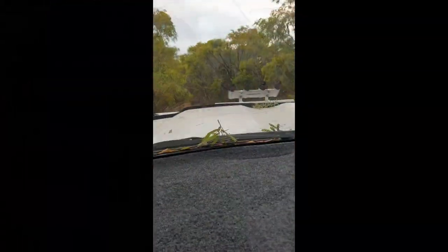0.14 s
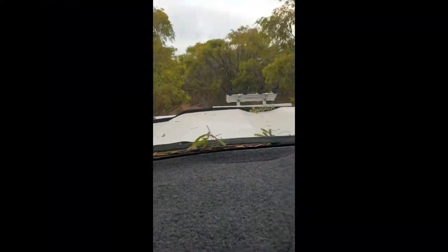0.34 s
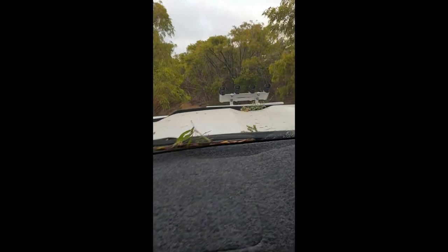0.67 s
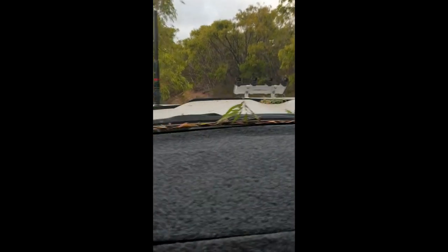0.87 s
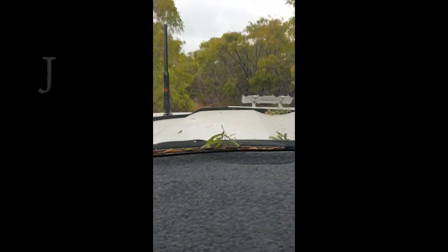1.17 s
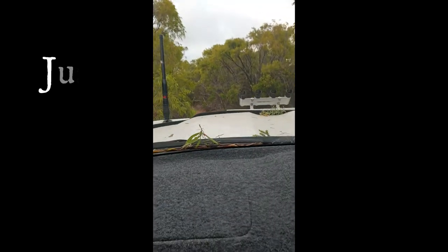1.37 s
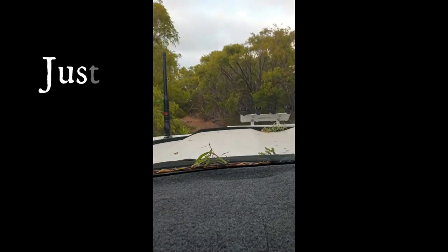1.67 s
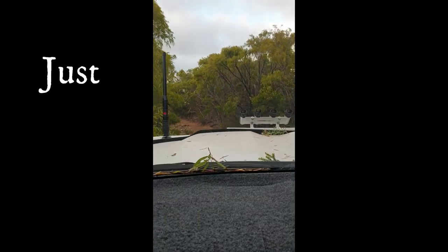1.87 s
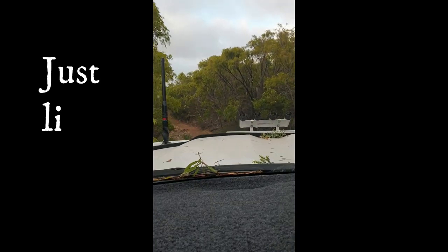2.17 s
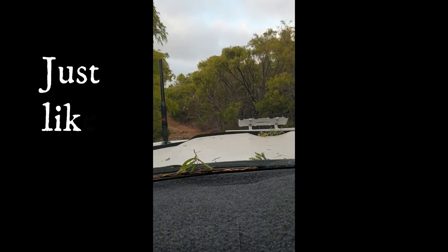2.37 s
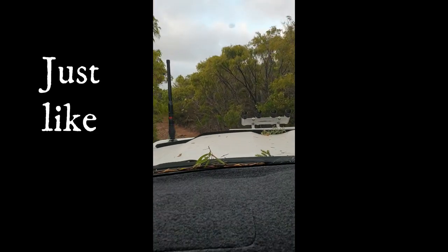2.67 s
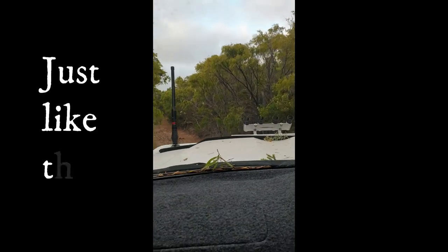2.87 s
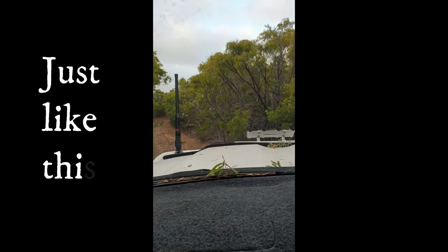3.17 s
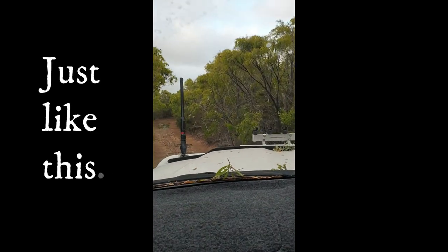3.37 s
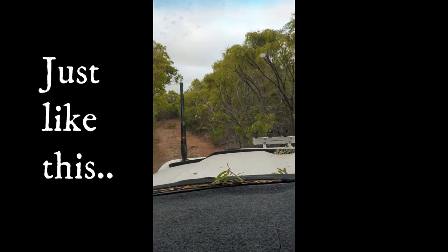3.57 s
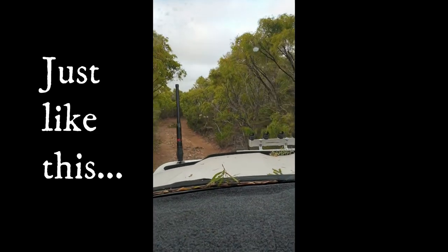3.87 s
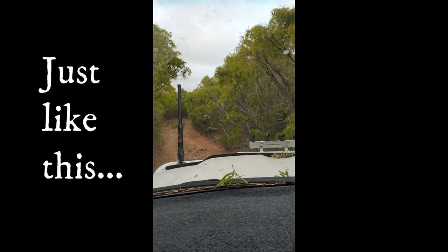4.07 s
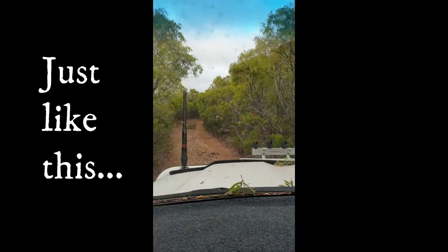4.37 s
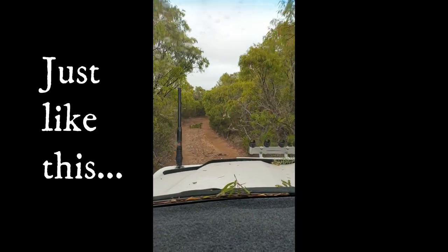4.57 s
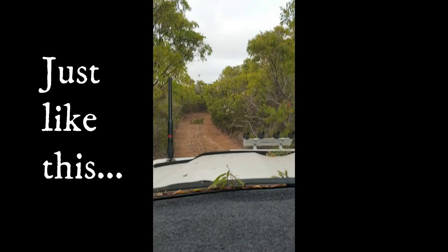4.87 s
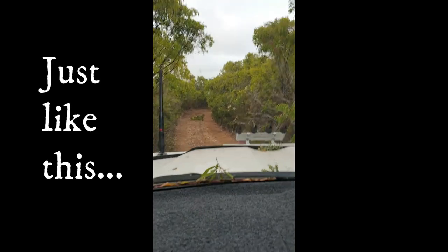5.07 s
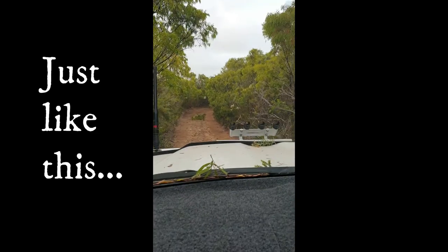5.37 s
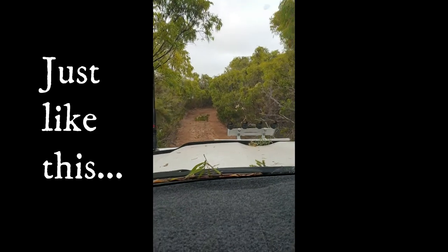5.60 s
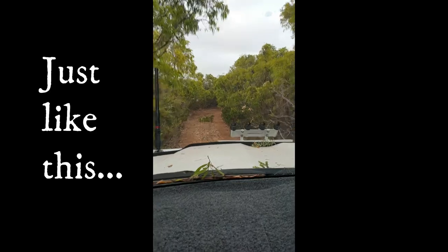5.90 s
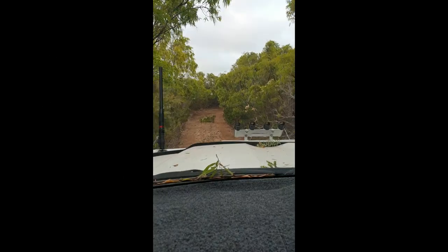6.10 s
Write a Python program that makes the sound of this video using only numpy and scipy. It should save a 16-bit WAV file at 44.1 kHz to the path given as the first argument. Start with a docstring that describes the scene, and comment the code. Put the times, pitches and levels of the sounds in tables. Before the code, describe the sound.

A vehicle cabin rumbles and clatters over ruts while leaves brush the paint and twigs crack, ending in high squeaks and rasping branch scrapes on the right.

```python
"""Overgrown dirt track from inside a four-wheel drive

The engine booms as pulses at its firing rate, revs twice and settles; the body adds short low notes.
Tyres roll as low noise, rough ground drums the body, and the load clatters in grains and knocks.
Leaves brush the paint as dense puffs of noise; twigs whip it with short coloured bursts.
At the end a branch drags along the right side, with stick-slip tones and jerky buzzing rasps."""
import sys
import numpy as np
from scipy import signal
from scipy.fft import rfft, irfft, next_fast_len
from scipy.io import wavfile

SR = 44100
rng = np.random.default_rng(int(sys.argv[2]) if len(sys.argv) > 2 else 0)


def put_to_file(sound):
    """Save the sound as 16-bit audio at rate SR, in the file named by the first command-line argument."""
    columns = np.atleast_2d(sound).T  # one column per channel
    safe = np.clip(columns, -1, 1)
    whole_steps = np.round(safe * 32767)
    wavfile.write(sys.argv[1], SR, whole_steps.astype(np.int16))


N = 275228
TIME = np.arange(N) / SR

# Hiss of fine leaves and top of a twig's blow. Each row: frequency in Hz, relative density in dB per Hz.
TOP = [(5500, -33), (8000, -1), (11500, 4.5), (16000, -5)]


def engine(flutter_db=1.34, order_flutter_db=4.0, upper_follow=0.13, cabin_hz=135):
    """Exhaust pulses boom in the cabin; weaker orders barely follow the pull and vary with uneven firing."""
    # Engine speed. Each row: time in seconds, firings per second.
    speed_curve = [(0, 49), (0.32, 46.7), (0.48, 66.5), (0.7, 67), (0.82, 81), (1.04, 95), (1.15, 100),
                   (1.36, 70), (1.5, 55), (1.88, 43), (2.1, 51.7), (2.2, 55.5), (2.41, 89), (2.59, 86),
                   (2.72, 67), (2.88, 49.3), (3.14, 45.5), (3.34, 54), (3.5, 51), (4.45, 53), (6.24, 50)]
    # How hard the engine pulls. Each row: time in seconds, level in dB.
    load_curve = [(0, -35), (0.17, -26.5), (0.31, -30.5), (0.44, -24.5), (0.73, -27), (0.87, -36),
                  (1.01, -21), (1.2, -27.5), (1.4, -35.5), (1.5, -24.5), (1.58, -38), (2.0, -37),
                  (2.2, -23), (2.42, -35), (2.68, -39), (2.86, -26.5), (3.02, -27), (3.13, -31.5),
                  (3.28, -24), (3.58, -29), (4.15, -25), (5.28, -23.5), (5.37, -26), (6.24, -26)]
    # Weaker engine orders. Each row: multiple of the firing rate, level in dB before the cabin's roll-off.
    order_levels = [(1.5, -45.5), (2, -41), (3, -52)]
    firing_hz, = in_time(speed_curve)
    db, = in_time(load_curve)
    phase = 2 * np.pi * np.cumsum(firing_hz) / SR
    out = from_db(db + flutter_db * drift(24)) * np.sin(phase)
    for multiple, order_db in order_levels:
        # the orders fade above the cabin's boom
        passed = 1 / np.hypot(1, (multiple * firing_hz / cabin_hz) ** 3)
        gain = from_db(order_db + upper_follow * (db - db.mean()) + order_flutter_db * drift(12))
        out = out + passed * gain * np.sin(multiple * phase + 2 * np.pi * rng.random())
    return np.sqrt(2) * out


def branch(tips_db=4.5, stem_db=6.0):
    """A branch drags down the right side: tips squeal high, stems groan lower, the limb sings, bark rasps."""
    # Thin tips squealing. Each row: start in seconds, length in seconds, crest pitch in Hz,
    # sag as a share of pitch (negative rises), level in dB before the tips' gain, roughness from 0 to 1.
    tip_slides = [(5.108, 0.07, 7280, 0.014, -44.5, 0.2), (5.326, 0.032, 4217, 0.0074, -39, 0.65),
                  (5.38, 0.024, 4267, -0.0071, -38.5, 0.55), (5.405, 0.097, 4288, 0.012, -35.5, 0.5),
                  (5.488, 0.067, 4190, -0.02, -32.5, 0.54), (5.555, 0.04, 4290, 0.12, -28.5, 0.5),
                  (5.593, 0.022, 3976, -0.053, -31, 0.9), (5.662, 0.051, 4540, 0.022, -41.5, 0.28),
                  (5.718, 0.078, 4304, 0.16, -37, 0.33), (5.802, 0.018, 3100, -0.096, -39, 0.43),
                  (5.803, 0.012, 6345, 0, -41.5, 0.42), (5.817, 0.027, 3894, -0.06, -40.5, 0.5),
                  (5.86, 0.15, 4370, 0.135, -41.5, 0.5), (6.017, 0.069, 4748, 0.0061, -44, 0.48),
                  (6.179, 0.087, 4440, -0.005, -41.5, 0.41)]
    # Thick stems groaning against the panel. Each row: start in seconds, length in seconds, crest pitch in Hz,
    # sag as a share of pitch (negative rises), level in dB before the stems' gain, roughness from 0 to 1.
    stem_slides = [(5.488, 0.055, 233.4, 0.025, -44, 0.5), (5.507, 0.0037, 1418, 0, -32.5, 0.4),
                   (5.518, 0.025, 1295, 0.0097, -38.5, 0.5), (5.659, 0.009, 2030, 0, -45, 0.62),
                   (5.662, 0.061, 764, -0.08, -46, 0.62), (5.707, 0.007, 1149, -0.117, -40, 0.76),
                   (5.81, 0.012, 1603, 0.041, -48.5, 0.8), (6.041, 0.016, 693, 0.022, -46.5, 0.41),
                   (6.182, 0.041, 691, 0.04, -43, 0.5)]
    # Tip overtones from the second upwards. Each entry: level in dB relative to the fundamental.
    tip_overtones = [-20, -23.5]
    # Stem overtones from the second upwards. Each entry: level in dB relative to the fundamental.
    stem_overtones = [-6.5, -21, -16, -24, -19]
    tip_grip = dict(jitter=.048, jitter_rate=1000, waver=.005, flutter_db=2.8)
    stem_grip = dict(jitter=.06, jitter_rate=500, waver=.02, flutter_db=2.5)
    tips = sum(squeal(slide, tip_overtones, **tip_grip) for slide in tip_slides)
    stems = sum(squeal(slide, stem_overtones, **stem_grip) for slide in stem_slides)
    high = from_db(tips_db) * cabin(tips, t60=0.075, wet_db=8.0)
    low = cabin(from_db(stem_db) * stems + limb(), t60=0.13, wet_db=0.0)
    bark = cabin(rasp(), t60=0.16, wet_db=3.0)
    return place(high + low + bark, side_db=-6.5)


def squeal(slide, overtones_db, crest_share=0.1, sag_power=1.1, **grip):
    """One short slide: its pitch crests early, then shifts by its sag as the wood unbends."""
    start_s, length_s, crest_hz, sag, db, rough = slide
    progress = np.clip((TIME - start_s) / length_s, 0, 1)
    from_crest = np.abs((progress - crest_share) / (1 - crest_share))
    hz = crest_hz * (1 - sag * from_crest ** sag_power)
    return from_db(db) * stroke(start_s, length_s) * stick_slip(hz, rough, overtones_db, **grip)


def limb():
    """The main limb bows the panel and grips fairly evenly: a long note that throbs as the pressure shifts."""
    # The limb's note. Each row: time in seconds, pitch in Hz, level in dB.
    limb_curve = [(5.83, 1215, -53), (5.842, 1195, -41), (5.862, 1168, -33.5), (5.9, 1112, -41),
                  (5.926, 1155, -34.5), (5.975, 1125, -37), (6.026, 1185, -42), (6.075, 1156, -55),
                  (6.128, 1156, -36), (6.15, 1150, -40)]
    # Limb overtones from the second upwards. Each entry: level in dB relative to the fundamental.
    limb_overtones = [-5.5, -18, -16, -19.5, -16.5]
    hz, db = in_time(limb_curve)
    tone = stick_slip(hz, .3, limb_overtones, jitter=.06, jitter_rate=550, waver=.025, flutter_db=2.5)
    throb = from_db(2.2 * drift(60))
    start_s, end_s = limb_curve[0][0], limb_curve[-1][0]
    return from_db(db) * stroke(start_s, end_s - start_s) * tone * throb


def rasp(level_db=3.5, treble_db=-5.5, wander_db=1.5, favour_db=7, favour_octaves=0.9):
    """Rough bark slips in nearly regular jerks that buzz the door panel; each contact favours other modes."""
    # Bark on the panel. Each row: start in seconds, length in seconds, slips per second,
    # level in dB and treble in dB (both before the layer's gains), pitch the contact favours in Hz.
    bark_strokes = [(5.517, 0.018, 259, -36, 4.5, 2740), (5.535, 0.016, 259, -41, -20, 1300),
                    (5.575, 0.075, 150, -37.5, -4, 1410), (5.651, 0.02, 260, -36, -6, 1900),
                    (5.697, 0.028, 170, -38, -6.5, 1110), (5.814, 0.031, 295, -45.5, -3.5, 1890),
                    (6.024, 0.034, 340, -42.5, -13, 1515), (6.135, 0.036, 338, -35.5, -19, 1094),
                    (6.184, 0.053, 338, -40, -18, 989)]
    # Door panel modes. Each row: frequency in Hz, width in Hz, relative level in dB.
    panel_modes = [(486, 110, -1), (820, 250, 2), (1245, 190, 3), (1580, 170, -1.5), (1865, 130, 1),
                   (2120, 260, 2), (2530, 410, -0.5), (3390, 360, -5.5)]
    jitter, grit = .05, .36
    strokes = np.array([stroke(s, length_s) for s, length_s, *_ in bark_strokes])
    # overlapping strokes share an average slip rate
    weights = strokes + 1e-9
    slips_per_s = np.array(bark_strokes)[:, 2] @ weights / weights.sum(axis=0)
    cycles = np.cumsum(slips_per_s * (1 + jitter * drift(300))) / SR
    slips = rms_one(np.diff(np.floor(cycles), prepend=0) * from_db(4.0 * drift(200)))
    # gritty noise bursts out at each slip and dies before the next
    force = slips + grit * rms_one(rng.standard_normal(N) * np.exp(-3 * (cycles % 1)))
    modes = []
    for k, (hz, width, db) in enumerate(panel_modes):
        ringing = signal.lfilter(*signal.iirpeak(hz, hz / width, SR), force)
        modes.append((-1) ** k * from_db(db + wander_db * drift(40)) * ringing)
    modes = np.array(modes)
    treble_band = signal.butter(1, [5400, 7000], "band", fs=SR, output="sos")
    scratch = rms_one(signal.sosfilt(treble_band, force))
    mode_hz = np.array(panel_modes)[:, 0]
    out = 0
    for envelope, (_, _, _, db, bright_db, favoured_hz) in zip(strokes, bark_strokes):
        octaves_off = np.log2(mode_hz / favoured_hz)
        favour = from_db(favour_db * np.exp(-(octaves_off / favour_octaves) ** 2))
        buzz = rms_one(favour @ modes) + from_db(bright_db + treble_db) * scratch
        out = out + from_db(db + level_db) * envelope * buzz
    return out


def twigs(wood_db=1.5, crack_db=3.5, top_db=-6.5, big_twig_db=-29.0, growth=0.2):
    """Each twig springs back on a panel with a woody clack, a bright crack and its own ring."""
    # Twigs whipping the body. Each row: time in seconds, level in dB before the parts' gains,
    # sharpness in dB (thin dry twigs high, thick ones low), own pitch in Hz, ring in dB over that level.
    whips = [(0.183, -56, -5, 5970, 9.5), (0.2679, -40, -2, 3530, -16), (0.585, -33, 6.5, 3480, 2),
             (0.639, -54, 5, 6500, -6), (0.789, -62.5, -9.5, 2292, 12.5), (0.896, -43.5, 4.5, 4800, -3),
             (0.9683, -43.5, -1.5, 2840, 4.5), (0.9904, -45.5, 2, 4500, -5), (1.0865, -47, 0, 1590, 5.5),
             (1.1088, -48.5, 3, 2880, 10.5), (1.1798, -44, -4, 4220, -5), (1.4876, -29, 3, 3430, -2.5),
             (1.6574, -49, 1.5, 5250, 4.5), (2.0294, -57, -3.5, 1540, 2), (2.4825, -66, -15, 1669, 3),
             (2.797, -53.5, -3, 7920, 0), (2.8904, -52, 2, 2804, 1), (3.1738, -63, 5, 3710, 10),
             (3.2323, -61.5, -7, 3610, 7), (3.3575, -71, -13, 2205, 14.5), (3.4647, -60.5, -2, 4186, 6),
             (3.814, -55.5, 0, 2312, -3), (3.9798, -53, -1.5, 4480, -2), (4.083, -52.5, 3, 2200, -4),
             (4.318, -63.5, -14.5, 2983, 3), (4.4267, -62, -9, 6430, 3), (4.7227, -52.5, 12.5, 7996, -12),
             (5.024, -54, 12, 6200, 0), (5.168, -57.5, 1, 5400, 1)]
    # Woody clack. Each row: frequency in Hz, relative density in dB per Hz.
    wood_spectrum = [(500, -4.5), (1000, -3.5), (2000, -7), (3400, -6.5), (4500, -5), (7000, -63)]
    # Bright crack. Each row: frequency in Hz, relative density in dB per Hz.
    crack_spectrum = [(2500, -10), (4200, -7), (6500, 0.5), (7800, -9), (11000, -83)]
    # What a twig rings with. Each row: multiple of its pitch, relative density in dB per Hz.
    ring_shape = [(0.4, -42), (0.8, -17), (1, 3), (1.25, -19), (2.5, -45)]
    out = np.zeros((2, N))
    for s, db, sharp_db, hz, own_db in whips:
        # louder, bigger twigs chatter longer; sharper ones trade wood for top
        bulk = from_db(growth * (db - big_twig_db))
        clack = burst(wood_spectrum, rise_s=0.00088 * bulk, t60=0.2 * bulk, tail_db=-13.5)
        crack = burst(crack_spectrum, rise_s=0.003 * bulk, t60=0.11 * bulk, tail_db=-15.0)
        top = burst(TOP, rise_s=0.0015 * bulk, t60=0.1 * bulk, tail_db=-22)
        ring_spectrum = [(hz * multiple, d) for multiple, d in ring_shape]
        ring = burst(ring_spectrum, rise_s=0.00062, t60=0.073, tail_db=-20)
        hit = from_db(wood_db - sharp_db) * clack + from_db(crack_db) * crack
        hit += from_db(top_db + sharp_db) * top + from_db(own_db) * ring
        add(out, s, from_db(db) * hit)
    return place(out, side_db=-6.0)


def knocks(level_db=-6.5, t60=0.07, tail_db=-11.0, note_t60=0.066, note_rise_s=0.0019):
    """Loose gear bumps the body: a dull, short thud around one briefly ringing note."""
    # Gear knocking over bumps. Each row: time in seconds, level in dB before the layer's gain, pitch in Hz.
    gear_hits = [(0.095, -30, 196), (0.268, -35, 844), (0.791, -40, 644), (0.972, -31, 790),
                 (1.085, -36, 760), (1.112, -24, 850), (1.146, -32, 327), (1.197, -21.5, 640.4),
                 (1.269, -30, 750), (1.289, -30, 314.6), (1.359, -32, 653.5), (1.376, -28.5, 810),
                 (1.538, -20, 379.3), (1.554, -23, 345), (1.662, -43, 740), (1.852, -33.5, 995),
                 (2.068, -30.5, 648), (2.259, -32, 350), (2.262, -29, 233), (2.344, -35, 613),
                 (2.718, -35, 323.5), (3.697, -38, 695), (3.809, -32, 440), (4.079, -30.5, 1125),
                 (4.084, -22.5, 399), (4.094, -32, 559), (4.333, -36.5, 457), (4.701, -39, 624)]
    # What a knock rings with. Each row: multiple of its pitch, relative density in dB per Hz.
    thud_shape = [(0.1, -12), (0.88, -7), (1, -2), (1.14, -7), (2.6, -19), (6, -36), (20, -56)]
    out, t = np.zeros((2, N)), TIME[:SR // 3]
    for s, db, hz in gear_hits:
        thud_spectrum = [(hz * multiple, ring_db) for multiple, ring_db in thud_shape]
        thud = burst(thud_spectrum, rise_s=0.00055, t60=t60, tail_db=tail_db)
        note = np.sin(2 * np.pi * hz * t) * (1 - np.exp(-t / note_rise_s)) * from_db(-60 * t / note_t60)
        add(out, s, from_db(db + level_db) * (thud + note))
    return place(out, side_db=-6.0)


def leaves(stems_db=3.5, leaves_db=7.0):
    """Stems rub and leaves patter along the paint, louder where a bush presses in; fine leaves only hiss."""
    # Foliage on the paint. Each row: time in seconds, stems rubbing in dB, leaves brushing in dB,
    # both before the layer's gains.
    foliage_curve = [(0.0, -59, -62), (0.68, -61.5, -63.5), (0.85, -65, -61.5), (0.95, -56, -59),
                     (1.12, -50.5, -59), (1.28, -47, -54.5), (1.4, -50, -52), (1.87, -56, -63.5),
                     (1.93, -68, -64.5), (2.05, -57.5, -67), (2.23, -59, -61.5), (2.35, -55.5, -57.5),
                     (2.6, -66, -65), (2.75, -74, -58), (3.0, -76.5, -63), (3.15, -78, -58),
                     (3.3, -70, -67), (3.55, -66.5, -71), (3.69, -59, -67), (3.85, -57, -60.5),
                     (3.93, -68, -65), (4.0, -66, -60.5), (4.25, -66, -64), (4.55, -56.5, -62.5),
                     (4.67, -64.5, -67), (4.75, -55, -58.5), (4.96, -59, -59), (5.2, -56.5, -65.5),
                     (5.3, -63, -63)]
    # Bushes pressing harder. Each row: middle in seconds, half length in seconds, extra level in dB.
    bushes = [(4.585, 0.058, 8.5)]
    # Rubbing stems. Each row: frequency in Hz, relative density in dB per Hz.
    stem_spectrum = [(700, 6), (1400, 5), (2200, 1), (3000, -2), (4500, -29), (8000, -25)]
    # Brushing leaves. Each row: frequency in Hz, relative density in dB per Hz.
    leaf_spectrum = [(1800, 2.5), (3000, 0.5), (4000, 2), (5500, 1.5), (6800, 3), (7800, -11.5),
                     (10000, -12), (15500, -16)]
    rub, brush = in_time(foliage_curve)
    press = sum(db * swell(s, half_s) for s, half_s, db in bushes)
    stem_puffs = colour(grains(per_s=410, spread_db=0.5, t60=0.056), stem_spectrum)
    leaf_puffs = colour(grains(per_s=600, spread_db=3.0, t60=0.15), leaf_spectrum)
    out = from_db(rub + press + stems_db) * stem_puffs + from_db(brush + press + leaves_db) * leaf_puffs
    out = patches(out, patchy_db=2.5, rate=35)
    # a spray of fine leaves sweeps past
    out += from_db(-61) * swell(3.13, 0.075) * colour(rng.standard_normal((2, N)), TOP)
    return place(out, side_db=-7.5)


def ground(rumble_db=-43.5, rattle_db=-52.0, roll_db=-35.5, bump_rattle=0.36):
    """Tyres roll steadily over the dirt; rough patches and ruts drum the body and make the load clatter."""
    # Rough stretches. Each row: middle in seconds, half length in seconds, body drumming in dB,
    # load rattling in dB; their power adds to that of smooth dirt, which is 0 dB.
    rough_patches = [(0.537, 0.13, 5, 9), (1.244, 0.39, 13.5, 8), (1.55, 0.25, 7.5, 8),
                     (2.385, 0.11, 7.5, 10), (2.7, 0.15, -12, 1), (5.15, 0.32, -4, 1)]
    # Wheels dropping into ruts. Each row: time in seconds, drumming in dB relative to smooth dirt.
    ruts = [(0.083, 10.5), (0.267, 14.5), (0.589, 12.5), (1.091, 18.5), (1.266, 15.5), (1.85, 6.5),
            (4.082, 8)]
    # Tyre roll. Each row: frequency in Hz, relative density in dB per Hz.
    roll_spectrum = [(20, -14), (35, 14), (60, 16), (100, 11), (130, 7), (180, -41), (300, -70)]
    # Body drumming. Each row: frequency in Hz, relative density in dB per Hz.
    rumble_spectrum = [(25, -8), (60, -4), (100, 0), (145, 2.5), (200, -8.5), (300, -18), (500, -51.5)]
    # Load clatter. Each row: frequency in Hz, relative density in dB per Hz.
    rattle_spectrum = [(150, -22), (260, 4), (360, 3), (550, -2), (850, -4.5), (1300, -15), (2000, -25),
                       (4000, -61)]
    rise_s, fall_s = 0.0073, 0.079
    drumming = 1 + sum((from_db(db) * swell(s, half_s)) ** 2 for s, half_s, db, _ in rough_patches)
    shaking = 1 + sum((from_db(db) * swell(s, half_s)) ** 2 for s, half_s, _, db in rough_patches)
    jolts = 0
    for s, db in ruts:
        rise = np.clip((TIME - s) / rise_s, 0, 1)
        jolts = jolts + from_db(db) * rise * np.exp(-np.maximum(TIME - s - rise_s, 0) / fall_s)
    roll = from_db(roll_db) * colour(rng.standard_normal((2, N)), roll_spectrum)
    rumble = colour(rng.standard_normal((2, N)), rumble_spectrum)
    rumble = from_db(rumble_db) * np.sqrt(drumming + jolts ** 2) * rumble
    clatter = place(colour(grains(per_s=170, spread_db=3.5, t60=0.26), rattle_spectrum), side_db=-9.0)
    return roll + rumble + from_db(rattle_db) * np.sqrt(shaking + (bump_rattle * jolts) ** 2) * clatter


def booms(level_db=2.5):
    """The body flexes on its springs and the cabin air answers with a short low note."""
    # Body flexing. Each row: middle in seconds, half length in seconds,
    # peak level in dB before the layer's gain, pitch in Hz.
    flexes = [(1.106, 0.03, -26.5, 66), (1.875, 0.015, -24.5, 81.9), (2.61, 0.023, -28, 85.72),
              (4.114, 0.018, -23, 72), (4.81, 0.094, -31, 74.6), (5.65, 0.064, -32, 73.93)]
    out = 0
    for s, half_s, db, hz in flexes:
        note = np.sin(2 * np.pi * (hz * TIME + rng.random()))
        out = out + from_db(db) * swell(s, half_s) * note
    return from_db(level_db) * out


def stick_slip(hz, rough, overtones_db, jitter, jitter_rate, waver, flutter_db):
    """Green wood sticks and slips on paint; a rougher grip makes the pitch tremble more; rms 1."""
    tremble = rough * (jitter * drift(jitter_rate) + waver * drift(110))
    phase = 2 * np.pi * np.cumsum(hz * (1 + tremble)) / SR
    tone = sum(from_db(d) * np.sin(k * phase) for k, d in enumerate([0, *overtones_db], 1))
    return rms_one(tone * from_db(flutter_db * drift(170)))


def stroke(start_s, length_s, grip_s=0.01, let_go_s=0.02):
    """Envelope of a slide: grip just before the start, hold, let go after the end."""
    rise, fall = (TIME - start_s) / grip_s, (start_s + length_s - TIME) / let_go_s
    return np.clip(np.minimum(rise, fall) + 1, 0, 1) ** 2


def swell(middle_s, half_s):
    """A smooth rise and fall as something passes, down to 1/e at the half length."""
    return np.exp(-((TIME - middle_s) / half_s) ** 2)


def grains(per_s, spread_db, t60):
    """Random small contacts of uneven size, each a short dying puff, in two channels."""
    sizes = from_db(spread_db * np.minimum(rng.exponential(1, N), 3.5))
    hits = (rng.random(N) < per_s / SR) * sizes
    power = signal.lfilter([1], [1, -from_db(-120 / (t60 * SR))], hits ** 2 + 1e-18)
    return rms_one(np.sqrt(power) * rng.standard_normal((2, N)))


def burst(spectrum, rise_s, t60, tail_db, tail_t60=0.3):
    """A blow spread through panel and cabin: a quick swell, a fast decay and a weaker tail."""
    t = TIME[:SR // 3]
    decay = from_db(-60 * t / t60) + from_db(tail_db - 60 * t / tail_t60)
    shape = (1 - np.exp(-t / rise_s)) * decay
    return colour(rng.standard_normal((2, len(t))), spectrum) * shape / shape.max()


def patches(pair, patchy_db, rate):
    """Each third of an octave swells and fades by itself as different sprigs touch."""
    size = next_fast_len(N)
    spectrum = rfft(pair, size)
    hz = np.arange(size // 2 + 1) * SR / size
    # thirds of an octave above 1 kHz; the end bands take all that lies beyond
    band = np.clip(3 * np.log2((hz + 1) / 1000), 0, 9)
    out = 0
    for k in range(10):
        part = irfft(spectrum * np.maximum(1 - np.abs(band - k), 0), size)[:, :N]
        out = out + part * from_db(patchy_db * drift(rate))
    return rms_one(out) * pair.std()


def colour(pair, spectrum):
    """Two unrelated signals become a stereo field with this spectrum, alike in the bass; rms 1."""
    # Likeness of the two microphone channels. Each row: frequency in Hz, correlation as a share of 1.
    likeness = [(60, 0.98), (170, 0.99), (350, 0.78), (700, 0.33), (1500, 0.026), (8000, 0.013)]
    count = pair.shape[1]
    size = next_fast_len(count)
    hz = np.arange(size // 2 + 1) * SR / size
    alike = np.clip(at_hz(likeness, hz), -1, 1)
    mid, side = rfft(pair, size) * from_db(at_hz(spectrum, hz))
    both = np.sqrt(1 + alike) * mid + np.sqrt(1 - alike) * side * [[1], [-1]]
    return rms_one(irfft(both, size)[:, :count])


def cabin(x, t60, wet_db):
    """Direct sound, reaching the right a moment before the left, plus dense reflections from glass and trim."""
    t = TIME[:SR // 4]
    response = rng.standard_normal((2, len(t))) * from_db(-60 * t / t60)
    response *= from_db(wet_db) / np.linalg.norm(response, axis=1, keepdims=True)
    response[[0, 1], [9, 0]] += 1  # direct sound, left 9 samples late
    return signal.fftconvolve(x[None], response)[:, :N] / np.sqrt(1 + from_db(2 * wet_db))


def place(pair, side_db):
    """Set a sound to one side, as the near side shields the far microphone by an amount set by frequency."""
    # Shielding. Each row: frequency in Hz, factor on side_db (negative favours the other side).
    shadow = [(200, 0), (380, -0.36), (700, 0.35), (1300, 0.43), (2400, 0.72), (4400, 1.37), (7000, 2),
              (9000, -1), (15000, 1)]
    count = pair.shape[1]
    size = next_fast_len(count)
    left_over_right = side_db * at_hz(shadow, np.arange(size // 2 + 1) * SR / size)
    gains = from_db(np.array([left_over_right, -left_over_right]) / 2)
    gains = gains / np.sqrt(np.mean(gains ** 2, axis=0))
    return irfft(rfft(pair, size) * gains, size)[:, :count]


def add(out, s, sound):
    """Mix a sound in at a time in seconds."""
    at = max(round(s * SR), 0)
    out[:, at:at + sound.shape[1]] += sound[:, :N - at]


def drift(rate):
    """Smooth chance of rms 1, with this many random knots per second."""
    knots = rng.standard_normal(int(N / SR * rate) + 2)
    return rms_one(np.interp(TIME * rate, np.arange(len(knots)), knots))


def in_time(rows):
    """Each column of a curve at every sample."""
    s, *columns = np.transpose(rows)
    return [np.interp(TIME, s, c) for c in columns]


def at_hz(points, hz):
    """Read a spectrum on a log-frequency axis."""
    points_hz, values = np.array(points).T
    return np.interp(np.log(hz + 1), np.log(points_hz), values)


def from_db(db):
    """Decibels to gain."""
    return 10 ** (np.asarray(db) / 20)


def rms_one(x):
    """Scale to unit power."""
    return x / np.sqrt(np.mean(x ** 2) + 1e-20)


def scene():
    """Everything as heard from behind the windscreen."""
    return engine() + branch() + twigs() + knocks() + leaves() + ground() + booms()


def record(dry):
    """The top is cut steeply above 15.9 kHz."""
    return signal.sosfilt(signal.ellip(10, .1, 80, 15900, fs=SR, output="sos"), dry)


dry = scene()
out = record(dry)
put_to_file(out)
```